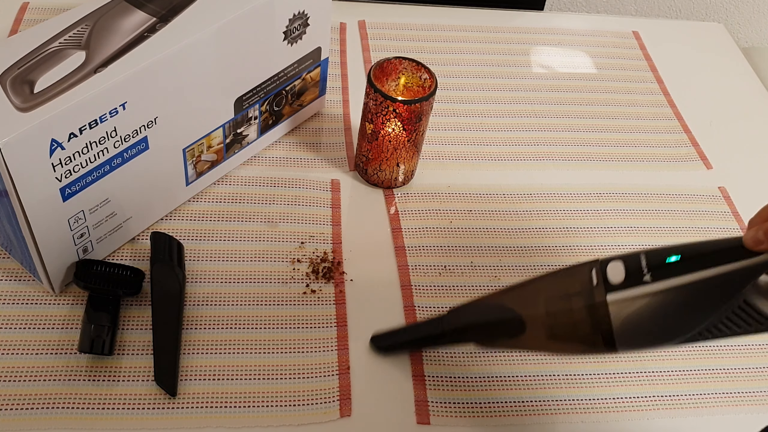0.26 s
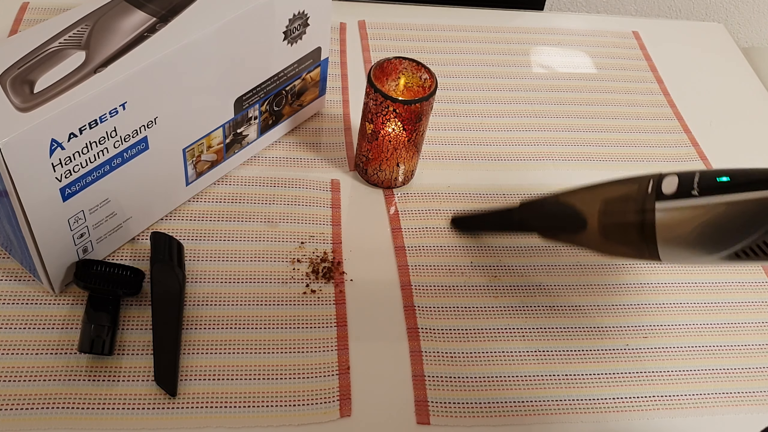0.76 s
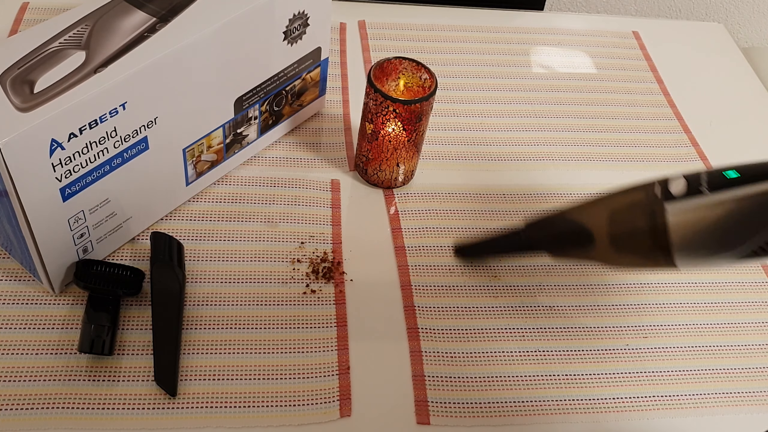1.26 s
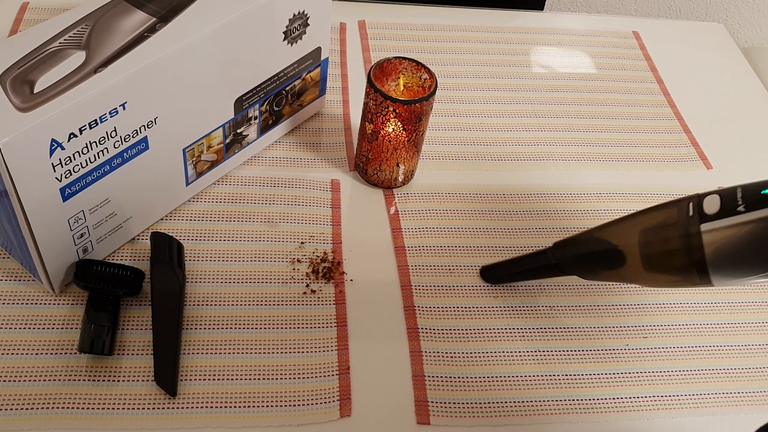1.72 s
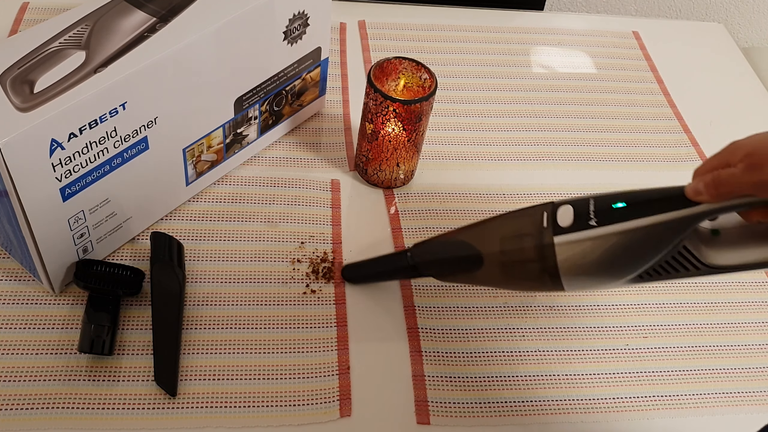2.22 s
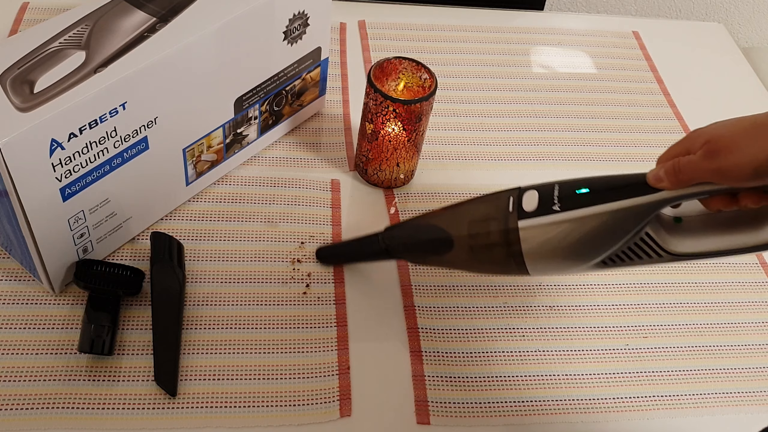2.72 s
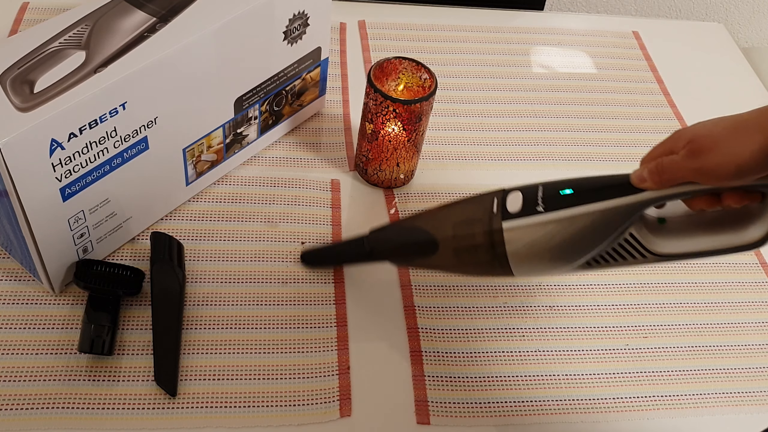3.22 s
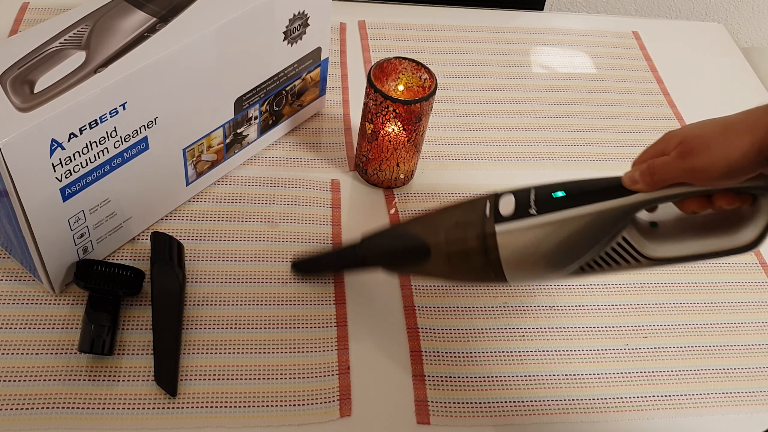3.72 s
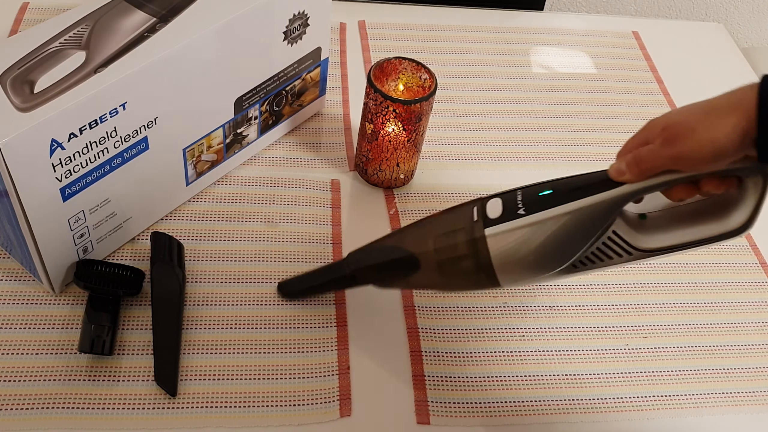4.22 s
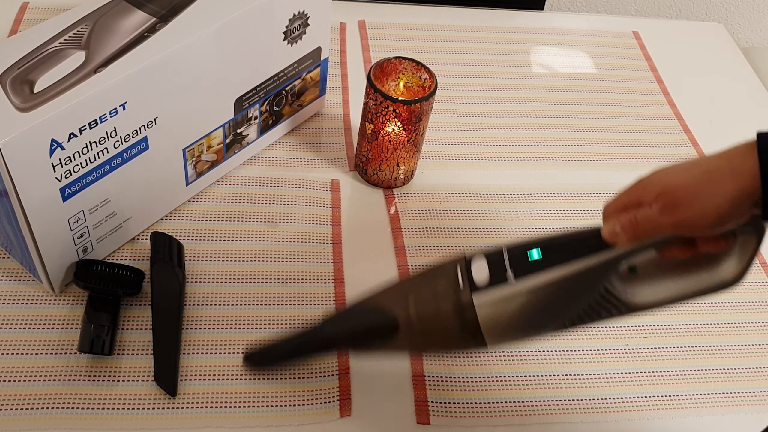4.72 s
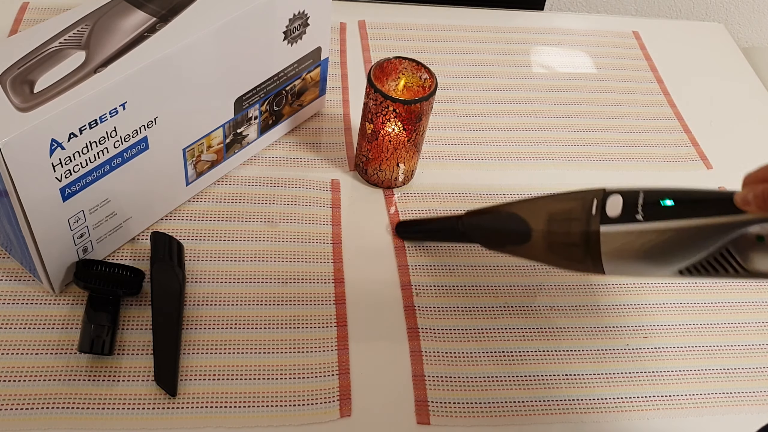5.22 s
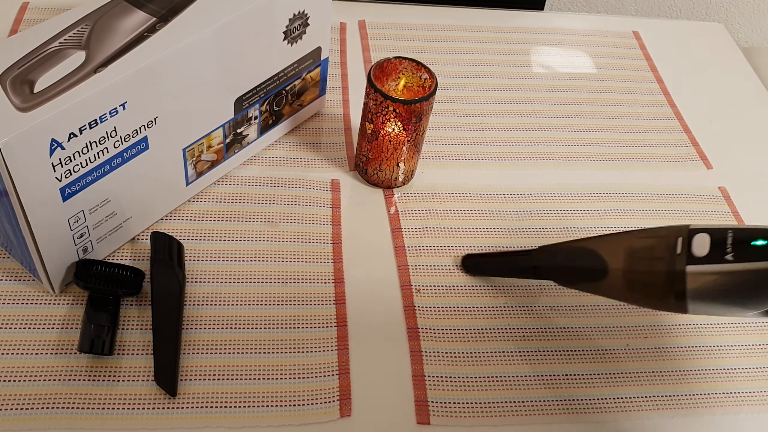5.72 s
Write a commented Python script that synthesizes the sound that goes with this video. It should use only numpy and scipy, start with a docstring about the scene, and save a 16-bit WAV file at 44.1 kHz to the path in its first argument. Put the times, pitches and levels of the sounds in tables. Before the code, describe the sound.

A small cordless vacuum runs from the start, close to a stereo microphone over a table indoors. Its motor makes a steady, medium-pitched whine with faint higher overtones, over a bright hiss of air, a soft rumble and a low hum. The whine swells and dips as the machine moves. For the first 1.6 seconds the hiss is a little stronger and leans left, then sits nearer the centre. Between about 1.4 and 2 seconds the whine thins, flutters and rises slightly in pitch, and the nozzle gives three tiny, breathy whistles against cloth around 1.8 to 1.9 seconds. The whine then returns fuller and slightly lower, pulsing gently in loudness, with one more faint whistle near 5.1 seconds. At about 5.8 seconds the vacuum is switched off: the whine slides down and fades with the hiss as the sound ends near 6 seconds.

```python
"""A small cordless vacuum, swept over a table close to a stereo microphone, then switched off.
The motor whines once per shaft turn, with faint multiples; the whine swells and dips as the machine
moves through the room's standing waves. Air rumbles in the cup and hisses from nozzle and vents over
a low hum. The nozzle whistles briefly as it brushes cloth. At switch-off the whine falls and fades."""
import sys
import numpy as np
from scipy import signal
from scipy.io import wavfile
from scipy.ndimage import uniform_filter1d

SR = 44100
rng = np.random.default_rng(int(sys.argv[2]) if len(sys.argv) > 2 else 0)


def output_pcm(signal):
    """Save a mono or channel-first signal as 16-bit PCM at the path in sys.argv[1].

    Samples are clipped to [-1, 1] before scaling.
    """
    pcm = np.clip(np.atleast_2d(signal).T, -1, 1) * 32767
    wavfile.write(sys.argv[1], SR, np.round(pcm).astype(np.int16))


N = 262836
TIME_S = np.arange(N) / SR


def gain(db):
    """Decibels to amplitude."""
    return 10 ** (np.asarray(db) / 20)


def unit_rms(x):
    """Scales to rms 1."""
    return x / np.sqrt(np.mean(abs(x) ** 2) + 1e-20)


def spectrum_at(rows, hz):
    """A spectrum table interpolated over log frequency."""
    row_hz, value = np.transpose(rows)
    return np.interp(np.log(hz + 1), np.log(row_hz + 1), value)


def curves(rows, t):
    """Each value column of a time table at times t."""
    row_s, *columns = np.transpose(rows)
    return [np.interp(t, row_s, column) for column in columns]


def pan(pan_db):
    """Left and right gains for a level difference."""
    return gain([pan_db / 2, -pan_db / 2])


def waver(width_hz):
    """Slow complex noise of rms 1; blurs a tone to the given width."""
    pole = np.exp(-np.pi * width_hz / SR)
    noise = rng.standard_normal(N) + 1j * rng.standard_normal(N)
    return unit_rms(signal.lfilter([1], [1, -2 * pole, pole * pole], noise))


OFF_S, SLOWING_HZ_PER_S, FADE_DB_PER_S = 5.803, 545, -88
COAST_S = np.maximum(TIME_S - OFF_S, 0)
# Shaft speed. Each row: time in seconds, turn rate in Hz.
SHAFT_SPEED = [(0, 472.3), (.2, 472), (.6, 468.5), (.95, 467.6), (1.1, 467.6), (1.3, 469), (1.42, 473.8),
               (1.9, 476), (2.08, 475.7), (2.25, 470.7), (2.4, 465.2), (3, 464.6), (4.1, 462), (4.8, 461.5),
               (5.1, 462), (5.8, 466)]
def shaft_angle(wander_hz=1.2):
    """Angle in radians; the shaft speeds up while the nozzle is partly blocked, slows once off."""
    speed_hz = curves(SHAFT_SPEED, TIME_S)[0] + wander_hz * waver(width_hz=5).real
    return 2 * np.pi * np.cumsum(speed_hz - SLOWING_HZ_PER_S * COAST_S) / SR


# Shaft tone in the standing waves. Each row: time in seconds, level in dB.
WHINE_MID = [(0.0, -19), (0.03, -20), (0.24, -21.5), (0.42, -21), (0.63, -28), (0.69, -26.5), (0.79, -19.5),
             (0.89, -25), (0.93, -23), (1.1, -28.5), (1.18, -21.5), (1.28, -21.5), (1.45, -28), (1.48, -42),
             (1.5, -54), (1.53, -28), (1.57, -34), (1.6, -25), (1.65, -35.5), (1.68, -28.5), (1.76, -35),
             (1.79, -29), (1.84, -37.5), (1.9, -26), (1.94, -34), (1.97, -29), (2.16, -24), (2.54, -21),
             (2.71, -25), (3.05, -21), (3.31, -25), (3.42, -20.5), (3.55, -24.5), (3.65, -24), (3.7, -20.5),
             (3.94, -21.5), (4.01, -25.5), (4.07, -18), (4.17, -19.5), (4.25, -24), (4.3, -19.5),
             (4.35, -24.5), (4.41, -19), (4.49, -24.5), (4.55, -19), (4.59, -22.5), (4.65, -18),
             (5.07, -19.5), (5.15, -25.5), (5.36, -19), (5.49, -23.5), (5.64, -20.5), (5.72, -23),
             (5.8, -20.5)]
# Its left-right difference, which escapes the dips. Each row: time in seconds, level in dB, lag in rad.
WHINE_SIDE = [(0, -33, .6), (.2, -30, 0.74), (.45, -30.5, .6), (.65, -36, 0.73), (.78, -30, .4),
              (.87, -34, 0.67), (.95, -31, .3), (1.08, -37, .7), (1.4, -31, .6), (1.55, -29, 1.3),
              (1.6, -26, 0.28), (1.64, -41, .2), (1.8, -27, 1.32), (1.88, -34, .6), (2, -28, 1.3),
              (2.15, -32, 0.75), (2.4, -40, 1), (2.7, -36, 1.6), (4, -35, 1.47), (4.1, -34, 0.48),
              (4.25, -36, 1.45), (5.1, -37.5, 1.5), (5.3, -32, 1.5), (5.5, -36, 1.33), (5.8, -36, 1.25)]
def whine(angle, echo_s=.039, echo_gain=.85):
    """One cycle per shaft turn; as it falls, it beats with a late echo still at the older pitch."""
    echo_lead = np.pi * SLOWING_HZ_PER_S * (COAST_S ** 2 - np.maximum(COAST_S - echo_s, 0) ** 2)
    beat = (1 + echo_gain * np.exp(1j * echo_lead)) / (1 + echo_gain)
    mid = gain(curves(WHINE_MID, TIME_S)[0]) * beat
    side_db, side_lag = curves(WHINE_SIDE, TIME_S)
    side = gain(side_db) * np.exp(-1j * side_lag)
    envelope = np.array([mid + side, mid - side]) * gain(FADE_DB_PER_S * COAST_S)
    rough = 1 + .045 * waver(width_hz=14)  # uneven turning
    return np.sqrt(2) * (envelope * rough * np.exp(1j * angle)).real


# Low shaft multiples. Each row: time in seconds, second multiple in dB, third in dB.
OVERTONE_LEVELS = [(0, -41.5, -44), (.3, -54, -39), (.6, -51, -47), (.84, -43, -56), (1.2, -41.5, -41),
                   (1.4, -52, -41), (1.6, -46, -39), (1.85, -52, -43), (2.1, -51, -37), (2.25, -50, -58),
                   (2.9, -51, -46), (3.5, -50, -46.5), (4.1, -48.5, -52), (4.62, -47.5, -45),
                   (5.2, -50, -46), (5.5, -53, -47), (5.65, -46, -58)]
def overtones(angle, fifth_db_per_hz=.77, drift_hz=3.79):
    """Multiples 2, 3 and 5 come and go as the machine moves; the fifth grows with speed."""
    second_db, third_db = curves(OVERTONE_LEVELS, TIME_S)
    speed_hz = curves(SHAFT_SPEED, TIME_S)[0]
    fifth_db = -54 + fifth_db_per_hz * (speed_hz - speed_hz.mean())
    out = np.zeros((2, N))
    for multiple, db, right_lead_rad in (2, second_db, .6), (3, third_db, 1.5), (5, fifth_db, 1.4):
        rough = (1 + 1.1 * waver(width_hz=26)) * (1 + .27 * waver(drift_hz))
        phase = multiple * angle + np.array([[0], [right_lead_rad]])
        out += gain(db + FADE_DB_PER_S * COAST_S) * (rough * np.exp(1j * phase)).real
    return np.sqrt(2) * out


# High shaft multiples. Each row: multiple, base level in dB, blur in Hz.
FAN_ORDERS = [(4, -60, 3.2), (6, -48, 7.6), (8, -47, 32), (9, -46, 27), (10, -54, 27), (12, -49, 48),
              (15, -51, 23), (21, -65, 20), (24, -57, 20), (25, -68, 27), (31, -62, 18)]
def fan_tones(angle):
    """Blade and commutator tones leave by the vents, so they follow the hiss in level and pan."""
    vent_db, pan_db = curves(AIR_FLOW, TIME_S)[0], curves(POSITION, TIME_S)[1]
    facing = gain(1.3 * (vent_db - vent_db.mean())) * pan(pan_db)
    out = np.zeros((2, N))
    for multiple, db, blur_hz in FAN_ORDERS:
        blur = np.array([waver(blur_hz), waver(blur_hz)])
        out += gain(db) * (blur * np.exp(1j * multiple * angle)).real
    return np.sqrt(2) * facing * out


# Air flow. Each row: time in seconds, vent hiss in dB, hiss brightness in dB, fizz in dB.
AIR_FLOW = [(0, -28.5, 0.5, -34), (.5, -28.5, 0.5, -34), (1.2, -27.5, 0, -33.5), (1.41, -30.5, 2.5, -35),
            (1.5, -26.5, 0, -34), (1.6, -26, -1.5, -34), (1.615, -28, -3, -37), (1.72, -32.5, 2, -36),
            (1.8, -29, -2, -37), (1.89, -31.5, -1, -38), (1.97, -31, 1.5, -33), (2.05, -31, 1, -37.5),
            (2.45, -32, 1, -36.5), (2.55, -30.5, 0, -35.5), (2.8, -31.5, 1, -35.5), (3.2, -31.5, 0, -36),
            (3.6, -31, -.5, -37), (4, -32.5, -1, -37.5), (4.35, -31, -1, -36.5), (4.95, -32.5, -1.5, -38.5),
            (5.2, -31.5, -1, -36.5), (5.46, -33, 2, -37.5), (5.52, -32, 1, -36), (5.81, -32, -1.5, -38),
            (5.96, -37.5, -3.5, -45)]
# Low end. Each row: time in seconds, rumble in dB, hum in dB.
BASS_LEVELS = [(0, -45, -73), (.4, -46.5, -58), (.5, -46, -51), (1.25, -45, -55.5), (1.5, -44, -67),
               (2.1, -48, -59), (2.45, -42.5, -52), (2.8, -46, -60), (3.7, -44.5, -56), (4, -47.5, -67.5),
               (5.96, -46, -57)]
# Four air noise spectra, low to high. Each row: frequency in Hz, relative density in dB.
RUMBLE_SPECTRUM = [(20, -26), (40, -21), (70, -29), (95, -20.5), (140, -10.5), (165, -18.5), (190, -8.5),
                   (250, -2.5), (320, -4), (355, -3), (400, -4), (550, -46)]
BODY_SPECTRUM = [(300, -28), (420, -3), (520, -3.5), (700, -0.5), (850, -4.5), (1100, -3), (1500, -2.5),
                 (1900, -4.5), (2400, -22)]
VENT_SPECTRUM = [(1000, -63), (1700, -16.5), (1980, -5.5), (2760, 0), (2990, -3), (3810, 2), (4930, -7),
                 (5380, -6), (6410, -9), (7180, -11), (7890, -15), (8500, -29), (11000, -28), (18700, -120)]
FIZZ_SPECTRUM = [(6000, -32), (7800, -25), (8400, -12.5), (11000, -6.5), (12100, -9), (14000, -8.5),
                 (15600, -14.5), (16500, 0.5)]
# Cup, duct and room resonances. Each row: centre in Hz, width in Hz, lift in dB.
RESONANCES = [(189, 43, 5.5), (306, 59, 5), (354, 23, 1), (384, 21, 2), (664, 26, 5.5), (1727, 29, 8.5),
              (2730, 130, -2.5), (3880, 190, -1), (4520, 69, 2.5), (5190, 160, 3.5), (11200, 240, 0)]
def air_power(hz, t, ring_hz=1207, ring_width_hz=160, ring_swing_s=.06):
    """Power by channel, frequency and time: four noise bands and the ring of the narrow nozzle."""
    vent_db, bright_db, fizz_db = curves(AIR_FLOW, t)
    pan_db = curves(POSITION, t)[1]
    swell_db = .46 * (vent_db - vent_db.mean())
    swing_db = 2.5 * unit_rms(uniform_filter1d(rng.standard_normal(len(t)), round(ring_swing_s / t[1])))
    lift_db = sum(db / (1 + (2 * (hz - centre) / width) ** 2) for centre, width, db in RESONANCES)

    def band(rows):
        return np.where((hz < rows[0][0]) | (hz > rows[-1][0]), -200, spectrum_at(rows, hz))

    def layer(shape_db, level_db, balance_db):
        density = gain(shape_db + lift_db) ** 2
        return (density / density.sum())[:, None] * (gain(level_db) * pan(balance_db))[:, None] ** 2

    beaming = gain(np.outer(np.clip(hz / 700 - 5.6, 0, 1), bright_db)) ** 2  # vents beam short waves
    ring_shape_db = -20 * np.log10(1 + (2 * (hz - ring_hz) / ring_width_hz) ** 2)
    rumble = layer(band(RUMBLE_SPECTRUM), curves(BASS_LEVELS, t)[0], .15 * pan_db)
    body = layer(band(BODY_SPECTRUM), -34 + swell_db, .41 * pan_db)
    hiss = layer(band(VENT_SPECTRUM), vent_db, pan_db) * beaming
    fizz = layer(band(FIZZ_SPECTRUM), fizz_db, .067 * pan_db - .6)
    ring = layer(ring_shape_db, -41.5 + swell_db + swing_db, .1 * pan_db)
    return rumble + body + hiss + fizz + ring


# Machine position. Each row: time in seconds, left arrival lag in ms, vent pan (left minus right) in dB.
POSITION = [(0, -0.013, 6), (.3, -0.054, 6), (.55, 0.024, 7), (1.6, 0.042, 6.5), (1.62, 0.054, 2),
            (1.9, 0.032, 3), (2.15, -0.019, 1.2), (2.6, -0.046, 1.6), (4, -0.079, 2.1), (4.85, -0.086, 1.8),
            (5.15, -0.018, 1.2), (5.96, 0.061, 1)]
# Direct path and two table bounces. Each row: extra lag in ms, coherence of the low hiss,
# coherence of the high hiss, change of the low coherence per dB of pan.
SOUND_PATHS = [(0.0033, 0.19, 0.2, -0.01), (0.17, 0.25, 0.054, -0.0652), (-0.19, 0.057, 0.13, 0)]
# Room sound. Each row: frequency in Hz, left-right coherence.
ROOM_COHERENCE = [(30, 0.72), (120, 0.9), (240, 1), (480, 1), (800, 0.67), (1200, 0.045), (2000, 0.03),
                  (3000, 0.01)]
def air_coherence(hz, t, room_lag_s=.00019):
    """Complex left-right coherence: bass from the room, treble by paths that move with the machine."""
    lag_ms, pan_db = curves(POSITION, t)
    high = np.clip(hz / 3000 - 1.7, 0, 1)[:, None]
    paths = 0
    for extra_ms, low_share, high_share, share_per_db in SOUND_PATHS:
        share = (1 - high) * np.maximum(low_share + share_per_db * pan_db, 0) + high * high_share
        paths += share * np.exp(2j * np.pi * np.outer(hz, lag_ms + extra_ms) / 1000)
    room = spectrum_at(ROOM_COHERENCE, hz) * np.exp(2j * np.pi * hz * room_lag_s)
    coherence = room[:, None] + paths * np.clip(hz / 800 - .8, 0, 1)[:, None]
    return coherence / np.maximum(abs(coherence), 1)


def air(size=2048, patch_db=1.75, drift_db=.78, flicker_db=.9):
    """Rushing air: turbulence comes in patches, reflections drift with the hand, the treble flickers."""
    hop = size // 4
    frames = N // hop + 5
    hz, t = np.fft.rfftfreq(size, 1 / SR), np.arange(frames) * hop / SR
    power, coherence = air_power(hz, t), air_coherence(hz, t)
    left_re, left_im, own_re, own_im, patches, drift = rng.standard_normal((frames, len(hz), 6)).T
    patches = unit_rms(uniform_filter1d(uniform_filter1d(patches, 10, axis=0), 6, axis=1))
    drift = unit_rms(uniform_filter1d(uniform_filter1d(drift, 16, axis=0), 40, axis=1))
    flicker = unit_rms(uniform_filter1d(rng.standard_normal(frames), 3))
    treble = np.clip(hz / 3000, 0, 1)[:, None]
    texture = gain(patch_db * patches + drift_db * drift + flicker_db * flicker * treble)
    left = left_re + 1j * left_im
    right = coherence * left + np.sqrt(np.maximum(1 - abs(coherence) ** 2, 0)) * (own_re + 1j * own_im)
    spectra = np.array([left, right]) * np.sqrt(power) * texture
    return np.sqrt(3 / 2) * signal.istft(spectra, nperseg=size, noverlap=size - hop)[1][:, :N]


def hum(pitch_hz=117.7, blur_hz=14):
    """A low wavering tone, nearly alike on both sides."""
    blur = .37 + waver(blur_hz) + .14 * np.array([waver(blur_hz), waver(blur_hz)])
    return gain(curves(BASS_LEVELS, TIME_S)[1]) * (blur * np.exp(2j * np.pi * pitch_hz * TIME_S)).real


# Nozzle whistles. Each row: peak time in seconds, level in dB, pitch in Hz, length in seconds.
WHISTLES = [(1.782, -30, 1220, .03), (1.842, -32, 1180, 0.03), (1.942, -30.5, 1138, 0.037),
            (5.112, -31.5, 1170, 0.02)]
def whistles(sag_hz_per_s=1200):
    """The nozzle brushes cloth and blows short, breathy tones that sag in pitch."""
    out = np.zeros(N)
    breath = 1 + .45 * waver(width_hz=92)
    for peak_s, db, hz, length_s in WHISTLES:
        t = TIME_S - peak_s
        envelope = gain(db) * np.exp(-6.7 * (t / length_s) ** 2)
        phase = 2 * np.pi * (hz * t - sag_hz_per_s * t ** 2 / 2)
        out += envelope * (breath * np.exp(1j * phase)).real
    return np.sqrt(2) * out * pan(pan_db=1)[:, None]


def scene():
    """Motor tones locked to one shaft, plus hum and whistles, over the air noise."""
    angle = shaft_angle()
    motor = whine(angle) + overtones(angle) + fan_tones(angle)
    return motor + hum() + whistles() + air()


def record(dry):
    """Steep low-pass band limit."""
    cutoff_hz = 15740
    taps = signal.firwin(1023, cutoff_hz, window=("kaiser", 10), fs=SR)
    return signal.oaconvolve(dry, taps[None], "same")


dry = scene()
out = record(dry)
output_pcm(out)
```